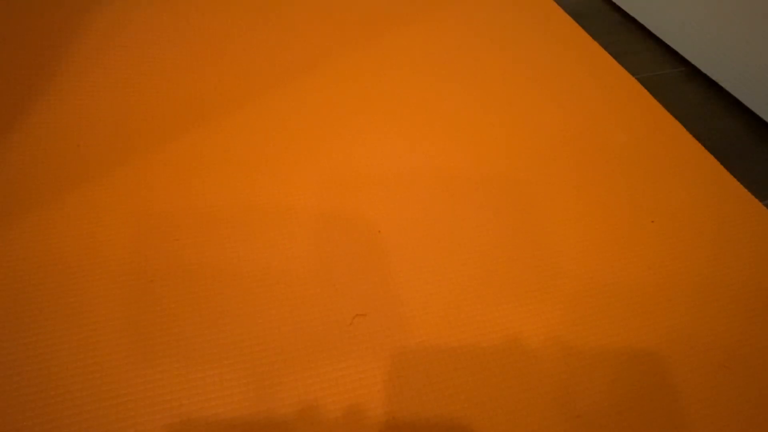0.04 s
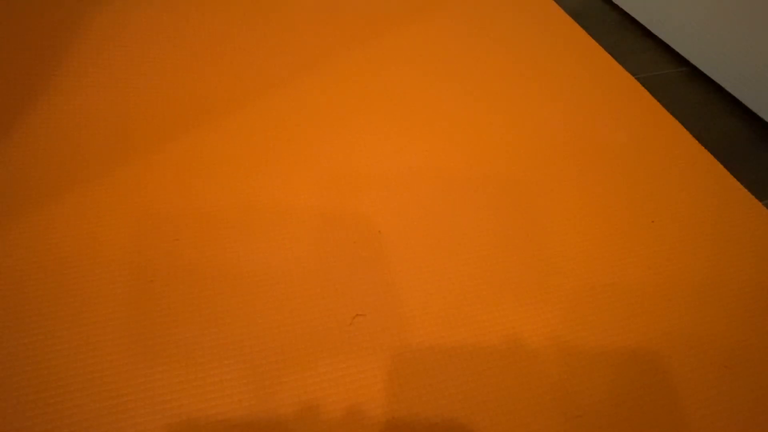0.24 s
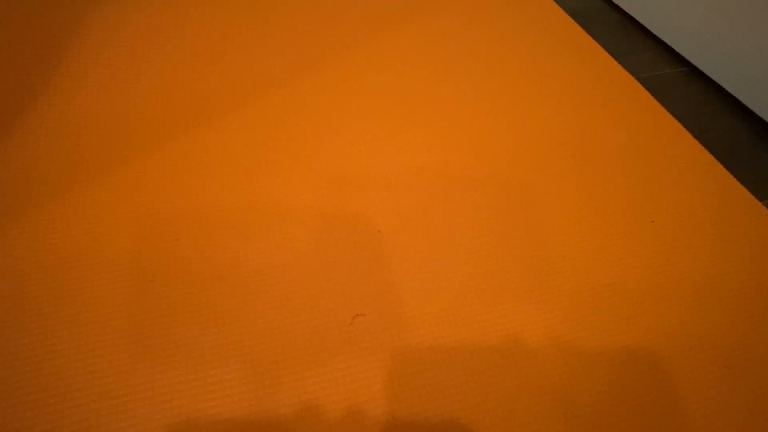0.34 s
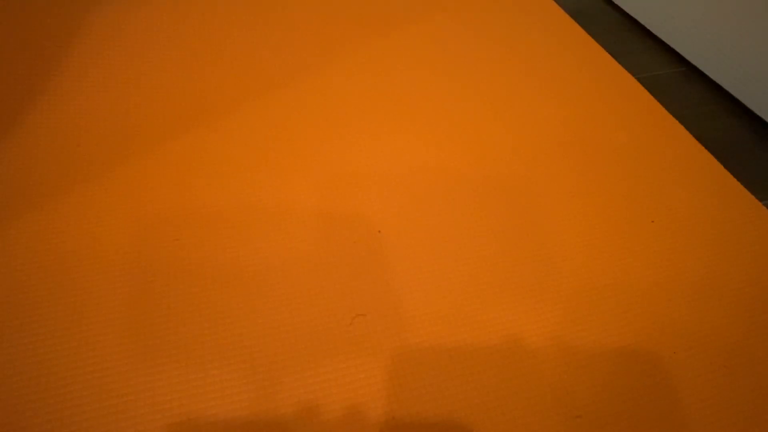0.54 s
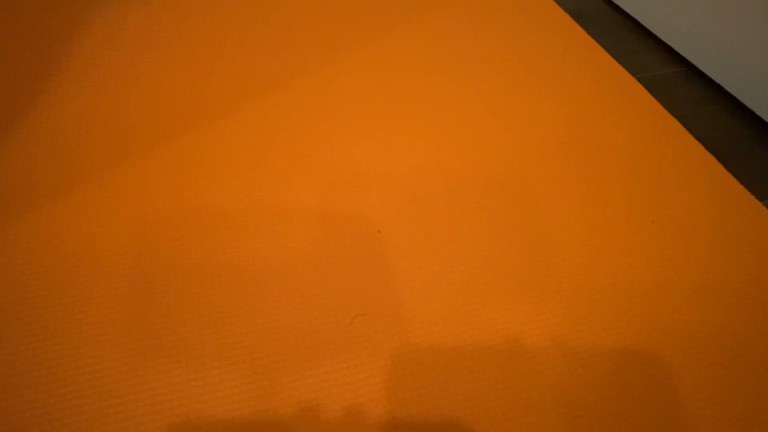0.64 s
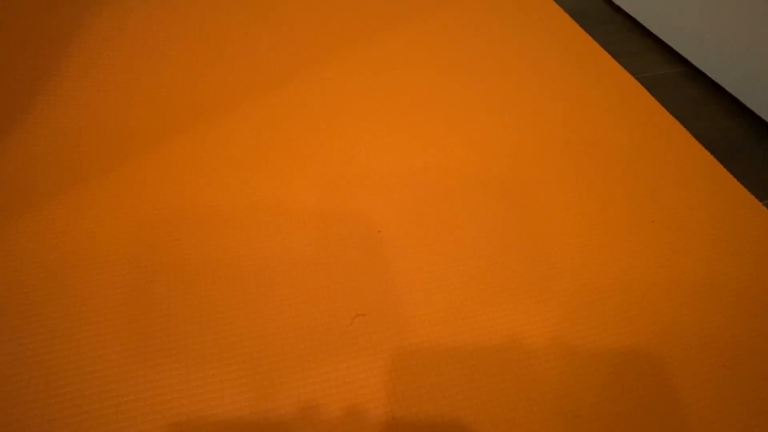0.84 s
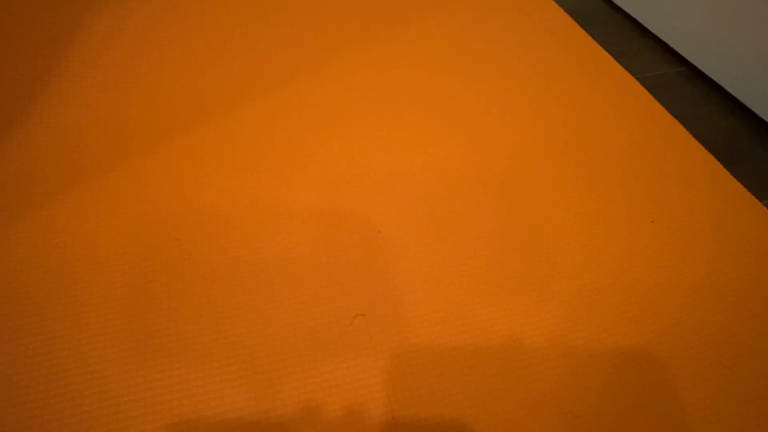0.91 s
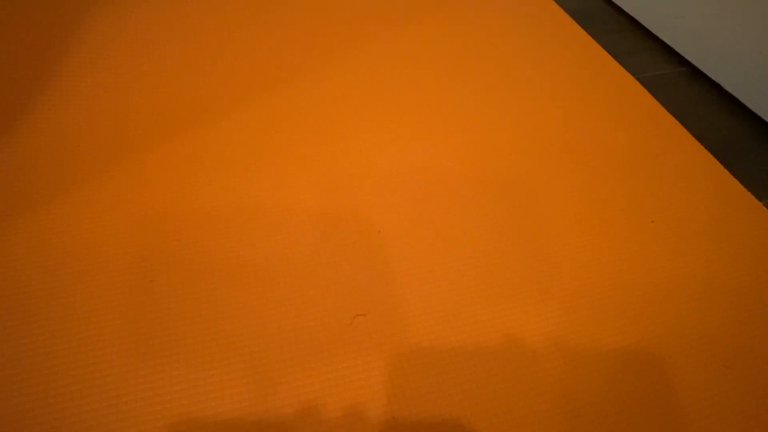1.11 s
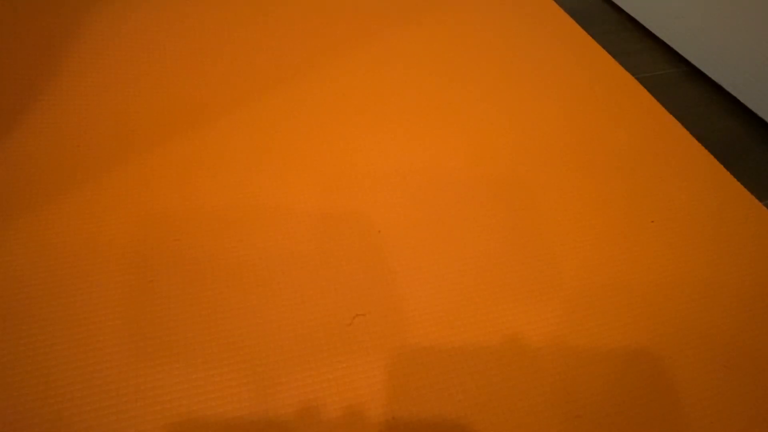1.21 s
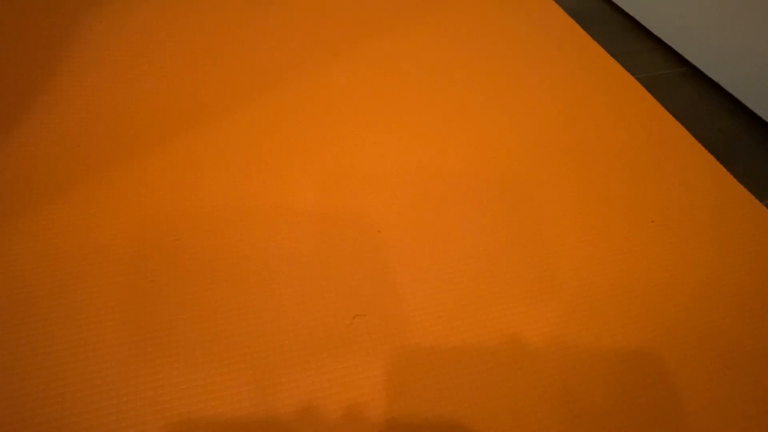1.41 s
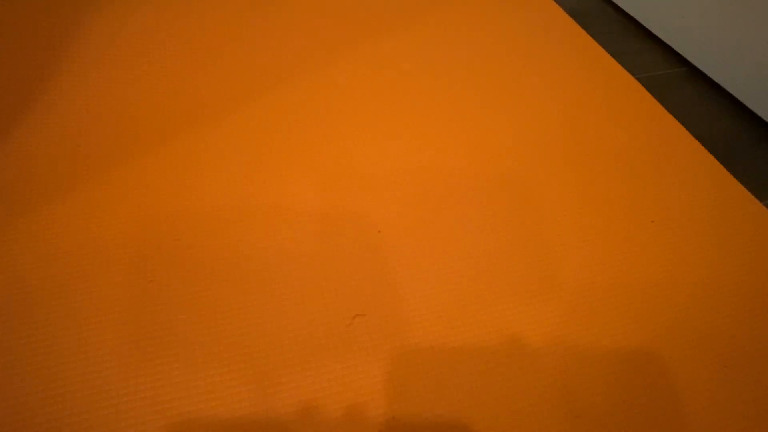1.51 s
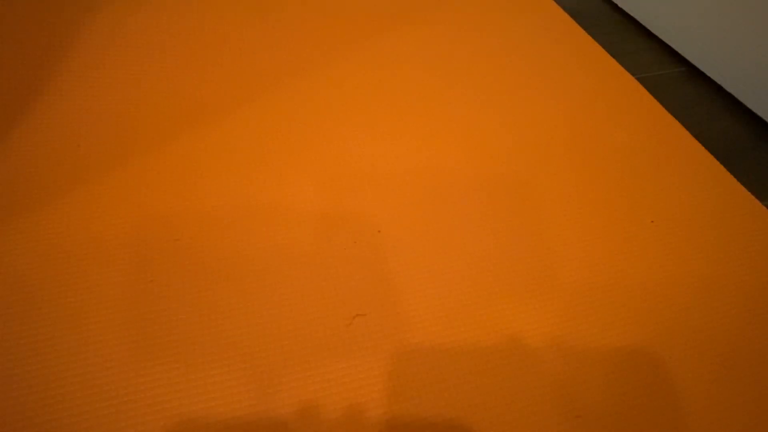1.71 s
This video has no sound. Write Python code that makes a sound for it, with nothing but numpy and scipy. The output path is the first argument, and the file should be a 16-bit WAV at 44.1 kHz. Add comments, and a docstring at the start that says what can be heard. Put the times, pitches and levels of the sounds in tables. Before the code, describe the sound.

A knife cuts stiff parcel wrapping, close in stereo: near silence, a dense crackle with dull box knocks, a rasping slice, scattered snaps with one sharp click, then another snap cluster and faint ticks in a small room.

```python
"""A knife works at stiff parcel wrapping on a table, heard by a close pair of spaced microphones.
The wrapping snaps and the box is knocked: short runs of slips ring fixed sets of decaying sine tones.
The blade and hands rub: grains and noise are filtered into three bands. A long cut rings narrow bands.
Random echoes add the room to snaps and knocks; low rumble and faint hiss lie under it all."""
import sys
import numpy as np
from scipy import signal
from scipy.fft import rfft, irfft
from scipy.io import wavfile
from scipy.ndimage import uniform_filter1d

SR = 44100
rng = np.random.default_rng(int(sys.argv[2]) if len(sys.argv) > 2 else 0)


def pcm_store(signal):
    """Save signal as 16-bit PCM."""
    levels = np.round(np.clip(np.atleast_2d(signal), -1, 1) * 32767)
    wavfile.write(sys.argv[1], SR, levels.astype(np.int16).T)


N = 77175  # length in samples, 1.75 s

RIGHT_LAG_S = 0.00017  # the right microphone is further from the work
SLIPS_SAME = 0.85  # left-right likeness of the slips in a blow, 0 to 1
NEAREST_DB, NEAREST_OCTAVES = 7.5, 0.12  # boost for tones at the strongest pitch, and its reach
DETUNE = 0.015  # random pitch spread of each tone, as a fraction
FIRST_SLIP = 0.8  # size of one firm slip against the whole run of slips


def gain_of(db):
    """Turns decibels into an amplitude factor."""
    return 10 ** (np.asarray(db) / 20)


def evened(x):
    """Scales a sound to an rms of 1."""
    return x / np.sqrt(np.mean(x ** 2) + 1e-20)


def read(points, hz):
    """Reads a curve of (pitch, value) points, with straight lines over log pitch."""
    point_hz, value = np.transpose(points)
    return np.interp(np.log(hz + 1), np.log(point_hz + 1), value)


def coloured(x, spectrum, lag_s=0):
    """Filters both channels by a spectrum, delays the right one and sets the rms to 1."""
    hz = np.fft.rfftfreq(N, 1 / SR)
    delay = np.exp(-2j * np.pi * hz * np.array([[0], [lag_s]]))
    return evened(irfft(rfft(x) * gain_of(read(spectrum, hz)) * delay, N))


def pair(x, same):
    """Two channels; the right one holds the share `same` of the left."""
    left, other = x
    return np.array([left, same * left + np.sqrt(1 - same ** 2) * other])


def blow_slips(rise_s, length_s):
    """Material slips in small random jerks that build up quickly and die away."""
    t = np.arange(1024) / SR
    jerks = rng.standard_normal((2, 1024))
    jerks = jerks * np.sqrt(abs(jerks))  # makes big jerks stand out
    slips = pair(jerks, SLIPS_SAME) * np.minimum(t / rise_s, 1) * np.exp(-t / length_s)
    # the firm slip comes halfway up the rise
    slips[:, round(rise_s * SR / 2)] += FIRST_SLIP * np.linalg.norm(slips[0])
    return slips


def blow_ring(modes, centre_hz, tilt_db, focus_db):
    """A struck body rings in several decaying tones, strongest near where the blow lands in pitch."""
    t = np.arange(6144) / SR
    hz, mode_db, t60_s = np.transpose(modes)[:, :, None]
    octaves = np.log2(hz / centre_hz)
    nearest_db = NEAREST_DB * np.exp(-(octaves / NEAREST_OCTAVES) ** 2)
    start_db = mode_db + nearest_db + tilt_db * octaves - focus_db * octaves ** 2
    heights = gain_of(start_db - 60 * t / t60_s) / np.sqrt(t60_s)
    tuned_hz = hz * (1 + DETUNE * rng.standard_normal((len(modes), 1)))
    tones = heights * np.sin(2 * np.pi * tuned_hz * t)
    return tones[::2].sum(0) - tones[1::2].sum(0)  # neighbours have opposite sign


def blows(events, modes, focus_db, rise_s):
    """Each blow is a short run of slips that sets the tones of a body ringing."""
    out = np.zeros((2, N + SR))
    lag = round(RIGHT_LAG_S * SR)
    for start_s, level_db, centre_hz, tilt_db, length_s, pan_db in events:
        ring = blow_ring(modes, centre_hz, tilt_db, focus_db)
        sound = signal.fftconvolve(blow_slips(rise_s, length_s), ring[None], axes=1)
        # the loudest 2 ms sets the level
        loudest = np.sqrt(np.max(uniform_filter1d((sound ** 2).mean(0), 90)))
        sound *= gain_of(level_db) / loudest
        for side in range(2):
            at = round(start_s * SR) + side * lag
            out[side, at:at + sound.shape[1]] += sound[side] * gain_of(pan_db * (0.5 - side))
    return out[:, :N]


# snaps of the wrapping: start_s, level_db (loudest 2 ms, before the low cut and the left-right split),
# strongest_hz, tilt_db per octave, crackle_s (slips fade to 37 %), left_over_right_db
SNAP_EVENTS = [(.126, -66, 3940, 4, .0012, 3.5), (.2021, -66, 9900, -10, 0.0012, -9),
               (.2358, -42.5, 6440, -6, 0.0017, 6), (.2385, -38, 4550, 3, 0.0038, 3.5),
               (.253, -43, 4940, 17, 0.01, -8), (.259, -41, 4400, 0.5, 0.012, 7),
               (.266, -34.5, 2200, -4, 0.0056, 4.5), (.2902, -38.5, 6230, 8.5, 0.0066, 0),
               (.2925, -35.5, 10700, -6, .0023, 0), (.302, -43, 3040, 2.5, 0.0079, -2.5),
               (.3400, -43.5, 4600, -3, 0.004, 1.5), (.5725, -42, 4400, -4, 0.0056, -2),
               (.5807, -39, 4360, -1, 0.0033, 0), (.6092, -38, 4330, -0.5, 0.0047, 1),
               (.6675, -46.5, 4430, -1.5, .0037, 0), (.6835, -38.5, 3480, -2, .006, 2),
               (.7139, -45, 3440, -2, .0064, 3), (.738, -50, 3500, -2, .0075, 1),
               (.7726, -27, 4230, 2.5, 0.0026, 2.5), (.7780, -41, 7050, 3, 0.0014, 3),
               (.785, -39, 8000, -4, 0.003, -2), (.802, -46, 4750, 3, .0034, -3),
               (.838, -53, 4830, 0, .0016, -2), (.8681, -36.5, 12100, 6, 0.00073, -0.5),
               (.8715, -45.5, 11200, -6, 0.0037, 1.5), (.8788, -43, 11500, 2, .004, -1),
               (.9103, -47.5, 4470, 0, 0.0043, 5), (.9933, -52, 4300, -3, 0.013, 2.5),
               (1.011, -55, 5130, 7, .0073, -3), (1.098, -55, 5030, -0.5, 0.0077, 1),
               (1.2537, -46, 14500, 6, 0.0023, -1), (1.354, -52, 4630, 0.5, 0.013, 9),
               (1.3612, -31.5, 3800, -0.5, 0.0061, 4), (1.3645, -33.5, 3130, 3.5, 0.0034, 6.5),
               (1.3672, -31.5, 4940, -4.5, 0.0015, 3.5), (1.379, -45, 3760, 4, .0028, -9),
               (1.414, -47, 2200, 3, .004, -2), (1.5874, -55, 7500, 2, 0.0075, -2),
               (1.5995, -52.5, 3130, -5, 0.0032, 6.5), (1.6508, -59.5, 1900, -11, .0023, 7),
               (1.693, -60.5, 11100, 11, .004, 3), (1.7047, -51.5, 4730, 4, 0.0021, 1),
               (1.7165, -51, 14600, 14, .002, -1), (1.744, -51.5, 3760, -1.5, 0.0065, 4)]
# tones the wrapping rings with: pitch_hz, level_db (relative), fade_s (to fall 60 dB)
WRAPPING_TONES = [(1300, -10, .004), (2150, -6, .007), (3050, -4, .006), (3500, -4, .006), (4000, -4, .005),
                  (4620, -4, .007), (5800, -5, .003), (6700, -4, .003), (8000, -4, .003), (10700, -1, .003),
                  (11900, -2, .003), (14600, -2, .002)]
SNAP_FOCUS_DB, SNAP_RISE_S = 2.5, 0.0012  # loss per squared octave; build-up of the slips
SHEET_LOW_HZ = 1510  # thin wrapping radiates little below this


def snapping():
    """Stiff wrapping gives way in jerks and its thin sheet rings brightly."""
    snaps = blows(SNAP_EVENTS, WRAPPING_TONES, SNAP_FOCUS_DB, SNAP_RISE_S)
    low_cut = signal.butter(3, SHEET_LOW_HZ, "high", fs=SR, output="sos")
    return signal.sosfilt(low_cut, snaps)


# knocks on the box: start_s, level_db (loudest 2 ms, before the left-right split),
# strongest_hz, tilt_db per octave, contact_s (slips fade to 37 %), left_over_right_db
KNOCK_EVENTS = [(.254, -42, 716, 3, .0048, 9), (.258, -37, 1800, 2, 0.0045, -2),
                (.263, -33.5, 650, 3.5, 0.0028, 10), (.2715, -36, 188, -1.5, 0.0033, -4),
                (.277, -42, 1540, 4, 0.0034, -2), (.280, -39.5, 85.6, 2.5, 0.0057, -1),
                (.289, -36, 972, 1, 0.0036, 5), (.3005, -34.5, 935, 1.5, 0.0024, 0.5),
                (.374, -43, 440, 2.5, 0.007, -0.5), (.407, -42, 413, -1, 0.0025, 4.5),
                (.421, -50.5, 970, -4.5, 0.01, 7), (.453, -48, 440, -0.5, 0.0039, 1),
                (.498, -54.5, 327, 0, .008, 5), (.688, -56, 890, -8, 0.0042, 15),
                (.9585, -53, 963, -6.5, 0.0019, 9.5), (.962, -55, 458, 1.5, 0.0029, 4.5),
                (1.088, -61.5, 302, 13, 0.007, 4), (1.413, -41.5, 924, 4.5, 0.0039, 1.5),
                (1.417, -49.5, 198, 0.5, 0.0028, -1.5)]
# tones of the box: pitch_hz, level_db (relative), fade_s (to fall 60 dB)
BOX_TONES = [(85, -8, 0.16), (188.8, -1.5, 0.065), (277.6, -1, 0.062), (327, 1.5, 0.026), (440.5, 1, 0.05),
             (654, -3.5, 0.041), (886, -1.5, 0.025), (1066, -0.5, 0.015), (1245, -2, 0.0096),
             (1528, -2.5, 0.023), (1790, -2.5, 0.015), (2380, 1.5, 0.013)]
KNOCK_FOCUS_DB, KNOCK_RISE_S = 5, 0.0013  # loss per squared octave; build-up of the slips


def knocking():
    """Short contacts ring the box, whose low tones last longest."""
    return blows(KNOCK_EVENTS, BOX_TONES, KNOCK_FOCUS_DB, KNOCK_RISE_S)


# how strongly blade and hands rub: time_s, bright_db, low_db, top_db
# (rms levels, before the flicker and the left-right split)
RUB_LEVELS = [(0, -100, -100, -105), (.11, -104, -96, -100), (0.133, -72, -63, -75), (0.228, -75, -63, -99),
              (0.263, -49, -36.5, -80), (.33, -55.5, -56.5, -92), (.41, -55.5, -51.5, -74),
              (.48, -53.5, -54, -67), (.55, -54.5, -56.5, -74), (.64, -61.5, -57.5, -79),
              (.76, -65.5, -57.5, -85), (0.808, -56, -65.5, -58), (.86, -68.5, -75.5, -72),
              (.94, -68, -71, -69), (.98, -70.5, -64, -71.5), (1.1, -73, -65.5, -75),
              (1.15, -72.5, -72.5, -78), (1.319, -76.5, -68.5, -78), (1.43, -60.5, -56.5, -63.5),
              (1.52, -67.5, -67, -69), (1.68, -77.5, -70, -83), (1.75, -72, -68.5, -89)]
# colour of the bright band: pitch_hz, level_db (relative, per Hz)
RUB_BRIGHT = [(880, -66), (1500, -7.5), (2740, -5), (3400, -1.5), (4400, 0.5), (6160, -3), (7310, -2.5),
              (8330, -10), (9500, -21), (12400, -34)]
# colour of the low band: pitch_hz, level_db (relative, per Hz)
RUB_DEEP = [(150, 0.5), (300, -1), (450, -8.5), (600, -4), (900, -2), (1500, -5), (2500, -10), (4000, -18)]
# colour of the top band: pitch_hz, level_db (relative, per Hz)
RUB_AIRY = [(6000, -53), (8000, 2), (9300, -1), (11000, 12), (13300, 2.5), (14800, 6), (16300, -9)]
GRAINS_PER_S, GRAIN_SPREAD_DB = 1200, 2.5  # density and unevenness of the grains
GRAIN_SHARE = 0.49  # part of grains in the drive; the rest is smooth noise
FLICKER_DB = 1.5  # rms wobble of the level
RUB_PAN_DB, RUB_SAME = 3.5, 0.098  # left over right in dB; left-right likeness, 0 to 1


def rub_drive():
    """Friction is many tiny slips of uneven size on top of smooth noise."""
    sizes = gain_of(GRAIN_SPREAD_DB * np.minimum(rng.exponential(1, (2, N)), 4))
    happens = rng.random((2, N)) < GRAINS_PER_S / SR
    grains = evened(sizes * happens * rng.choice([-1, 1], (2, N)))
    noise = rng.standard_normal((2, N))
    return pair(GRAIN_SHARE * grains + (1 - GRAIN_SHARE) * noise, RUB_SAME)


def rubbing():
    """Dense slips and friction noise in three bands, each following its own level."""
    time_s, bright_db, low_db, top_db = np.transpose(RUB_LEVELS)
    t = np.arange(N) / SR
    wobble = uniform_filter1d(uniform_filter1d(rng.standard_normal(N), 300), 300)
    flicker_db = FLICKER_DB * evened(wobble)  # shared by the three bands
    out = 0
    for level_db, spectrum in ((bright_db, RUB_BRIGHT), (low_db, RUB_DEEP), (top_db, RUB_AIRY)):
        band = coloured(rub_drive(), spectrum, RIGHT_LAG_S)
        out = out + band * gain_of(np.interp(t, time_s, level_db) + flicker_db)
    return out * gain_of([[RUB_PAN_DB / 2], [-RUB_PAN_DB / 2]])


# close bands of the taut wrapping: pitch_hz, width_hz, level_db (relative)
TAUT_BANDS = [(4860, 130, -2), (5330, 250, -1.5), (5900, 200, 0.5)]
TEAR_S, TEAR_SPREAD_S = 0.444, 0.07  # middle of the long cut; time from there to 37 %
TEAR_DB, TEAR_SLIPS_PER_S = -49, 2800  # rms before the swell and the left-right split; slip density


def tearing():
    """Slips of the blade in the long cut ring taut wrapping: a narrow, grainy hiss swells and fades."""
    t = np.arange(N) / SR
    slips = rng.standard_normal((2, N)) * (rng.random(N) < TEAR_SLIPS_PER_S / SR)
    drive = pair(slips, RUB_SAME)
    hiss = np.zeros((2, N))
    for hz, width_hz, db in TAUT_BANDS:
        hiss += gain_of(db) * signal.lfilter(*signal.iirpeak(hz, hz / width_hz, fs=SR), drive)
    swell = np.exp(-((t - TEAR_S) / TEAR_SPREAD_S) ** 2)
    sides_db = np.array([[RUB_PAN_DB / 2], [-RUB_PAN_DB / 2]])
    return gain_of(TEAR_DB + sides_db) * evened(hiss) * swell


# how long the room rings: pitch_hz, fade_s (to fall 60 dB)
ROOM_FADE = [(200, 0.52), (1000, 0.16), (4000, 0.19), (12000, 0.13)]
ROOM_DB = -8  # level of the echoes


def room(x):
    """Walls return sparse echoes of random sign, each band dying at its own speed."""
    taps = np.zeros((2, SR // 2))
    # one echo at a random place in every 20 samples
    at = np.arange(120, SR // 2 - 20, 20) + rng.integers(0, 20, (2, (SR // 2 - 121) // 20))
    np.put_along_axis(taps, at, rng.choice([-1., 1.], at.shape), 1)
    hz, t, bands = signal.stft(taps, SR, nperseg=256)
    fade = gain_of(-60 * t / read(ROOM_FADE, hz)[:, None])
    tail = signal.istft(bands * fade, SR, nperseg=256)[1]
    return signal.fftconvolve(x, tail / np.linalg.norm(tail[0]), axes=1)[:, :N]


# colour of the low rumble: pitch_hz, level_db (relative, per Hz)
RUMBLE_COLOUR = [(8.8, -54), (15, -30), (26, -15.5), (50, -1), (81, -1), (111, -4.5), (151, -17),
                 (199, -25.5), (265, -32.5), (520, -58)]
# colour of the hiss: pitch_hz, level_db (relative, per Hz)
HISS_COLOUR = [(180, -35), (300, 3), (522, -4), (1060, -3), (1500, -9), (4240, -12), (16500, -28.5)]
RUMBLE_DB, HISS_DB = -53.5, -77.5  # rms levels
RUMBLE_SAME = 0.975  # left-right likeness, 0 to 1


def background():
    """Low rumble of the building, nearly mono, and a faint hiss: two steady filtered noises."""
    rumble = coloured(pair(rng.standard_normal((2, N)), RUMBLE_SAME), RUMBLE_COLOUR)
    hiss = coloured(rng.standard_normal((2, N)), [(150, -59)] + HISS_COLOUR)  # no hiss in the bass
    return gain_of(RUMBLE_DB) * rumble + gain_of(HISS_DB) * hiss


def scene():
    """Adds all sources; only the snaps and knocks echo in the room."""
    hits = snapping() + knocking()
    return hits + gain_of(ROOM_DB) * room(hits) + rubbing() + tearing() + background()


# dips of the microphone housing: pitch_hz, width_hz
HOUSING_DIPS = [(9300, 160), (13300, 3100)]
NOTCH_DEPTH = 0.7  # part of the sound removed at the middle of a dip
BASS_ALIKE_HZ = 120  # below this both microphones hear nearly the same
EDGE_HZ = 16300  # upper band limit


def record(dry):
    """Close microphones share the bass, the housing cuts two dips, then the treble is cut off."""
    mid = dry.mean(0)
    side = signal.lfilter(*signal.butter(1, BASS_ALIKE_HZ, "high", fs=SR), dry[0] - mid)
    heard = np.array([mid + side, mid - side])
    for hz, width_hz in HOUSING_DIPS:
        around_dip = signal.lfilter(*signal.iirpeak(hz, hz / width_hz, fs=SR), heard)
        heard = heard - NOTCH_DEPTH * around_dip
    band_limit = signal.firwin(511, EDGE_HZ, window=("kaiser", 9), fs=SR)
    return signal.oaconvolve(heard, band_limit[None], "same")


dry = scene()
out = record(dry)
pcm_store(out)
```